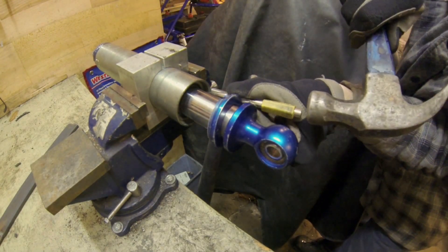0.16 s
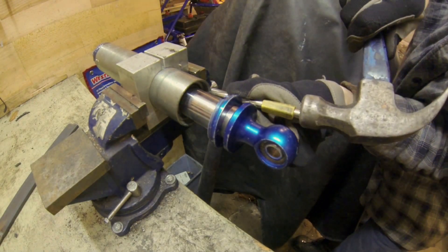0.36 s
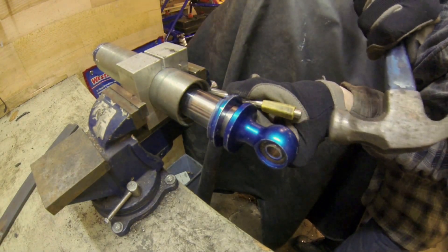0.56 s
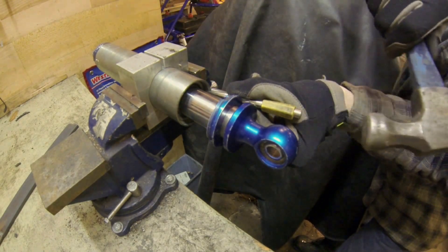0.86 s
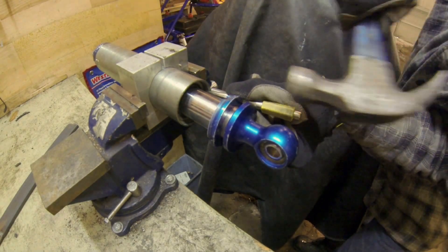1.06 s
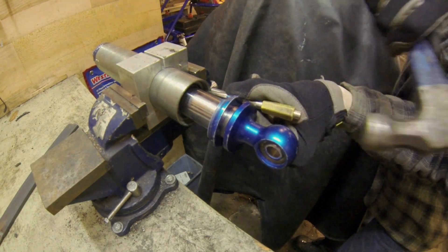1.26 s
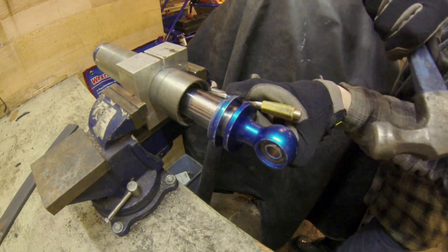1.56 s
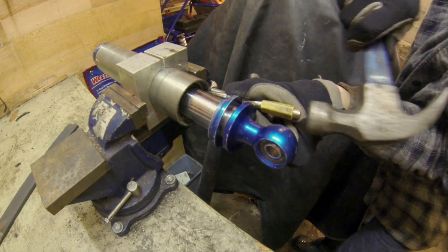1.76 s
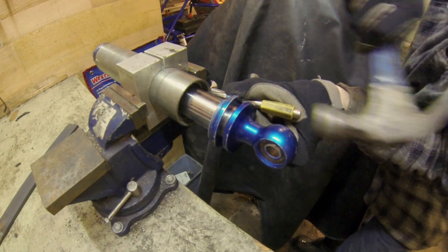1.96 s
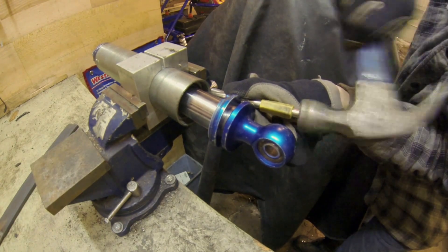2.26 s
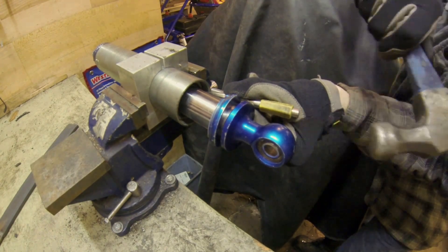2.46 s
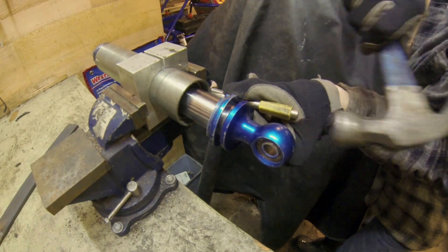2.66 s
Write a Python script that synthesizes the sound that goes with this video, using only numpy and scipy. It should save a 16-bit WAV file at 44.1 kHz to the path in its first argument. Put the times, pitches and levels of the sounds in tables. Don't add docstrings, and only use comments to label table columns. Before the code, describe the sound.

Hammer tapping a steel punch on a vise-held metal part, sharp clanks in a small workshop

```python
import sys
import numpy as np
from scipy import signal
from scipy.io import wavfile

SR = 44100
rng = np.random.default_rng(int(sys.argv[2]) if len(sys.argv) > 2 else 0)


def master(y):
    cut = np.clip(np.atleast_2d(y).T, -1, 1)
    pcm = np.round(cut * 32767)
    wavfile.write(sys.argv[1], SR, pcm.astype(np.int16))


def convert_level_to_amplitude(level_db):
    exponent = np.asarray(level_db, float) / 20
    return 10 ** exponent


N = 123479

# [f/Hz, level/dB per Hz]
HISS_SPECTRUM = [(5000, 2), (8500, 1), (10300, -3), (12000, -6), (15000, -4)]
# [f/Hz, level/dB per Hz]
AIR_SPECTRUM = [(20, -3.5), (42, -5.5), (130, -17), (377, -13.5), (900, -12.5), (1300, -24.5), (1800, -18),
                (3600, -30), (7000, -52), (16000, -71)]
# [multiple of shaft speed, level/dB rms]
HUM_LINES = [(1, -48), (3, -62), (6, -61), (9, -54), (12, -57), (18, -56), (25, -62)]
# [f/Hz, t60/s]
TAIL_SPECTRUM = [(71, -56), (120, -5.5), (150, -15), (261, 0.5), (355, -6), (839, -14), (5300, -35.5),
                 (12300, -44.5), (16000, -62)]
TAIL_DECAY = [(120, 0.38), (1000, 0.26), (4000, 0.4), (15000, 0.13)]
# [t/s, level/dB]
BAR_RINGS = [
    (1.98, -40),
    (2.2676, -52),
    (2.538, -42),
]
# [f/Hz, level/dB, t60/s]
LEG_MODES = [(40, -17.5, 0.55), (65.8, -6, 0.35)]
BENCH_MODES = [(69.86, -14.5, 0.55), (81.6, 7, 0.18), (87.9, -13.5, 0.44)]
VISE_MODES = [(204.7, -11.5, 0.4), (239.8, 6.5, 0.12), (252.6, -12, 0.097), (313.5, -18.5, 0.13),
              (407, -24, 0.09)]
JAW_MODES = [(476, -3, 0.062), (486, -2.5, 0.088), (523, -6.5, 0.082)]
PART_MODES = [(606.5, -5, 0.19), (693, 1.5, 0.088), (749, -12.5, 0.23), (843, -8, 0.17), (878, -7.5, 0.097),
              (1030, -2, 0.048)]
COLLAR_MODES = [(1194, -3, 0.047), (2303, -4, 0.064), (2343, -2.5, 0.024), (2607, -4, 0.084),
                (2865, -3, 0.041), (3367, -5.5, 0.032)]
PUNCH_MODES = [(1550, -2.5, 0.027), (1695, 2, 0.012), (1809, -5.5, 0.034), (1970, -18.5, 0.09)]
HEAD_MODES = [(3700, -7, .03), (3860, -3, .04), (4260, -7, .02), (4700, -8, .02), (5070, -7, .025),
              (5300, -6, .03), (5600, -6, .025), (6700, -11, .02), (7200, -12, .035), (8200, -7, .012),
              (9800, -5, .012), (11500, -14, .012)]
# [f/Hz, t60/s]
CRACK_SPECTRUM = [(180, -72), (300, -2), (801, 6), (1250, -24), (1480, -8), (5160, -7.5), (8220, -18),
                  (12300, -10.5), (16000, -52)]
CRACK_DECAY = [(300, 0.038), (1500, 0.069), (5000, 0.043), (15000, 0.0084)]
BLOW_S = [.2981, .6386, .9576, 1.3585, 1.6715, 1.9804, 2.2676, 2.5382]
# [clank level/dB, vise level/dB, bench level/dB, crack level/dB]
BLOW_LEVELS = [
    (-29, -29, -29.5, -28),
    (-25, -15.2, -15.5, -10.5),
    (-12.5, -18, -18.5, -6),
    (-6.5, -16, -17, -10.5),
    (-4, -15, -17, -14),
    (-4, -17, -17, -14),
    (-3.5, -19, -18.5, -12),
    (-4.5, -21, -19.5, -14),
]
# [part level/dB, jaw level/dB, collar level/dB, head level/dB,
# sharpness/dB per octave above 4 kHz]
BLOW_LANDINGS = [
    (-23, -19.5, -34.5, -36.5, -5),
    (-14.1, -7.5, -12.5, -16.5, -1.5),
    (-15, -9, -15.5, -11.5, -4.5),
    (-14, -9, -21.5, -18.5, -6),
    (-14, -11, -19.5, -20.5, 1.6),
    (-18, -19, -19, -18, -0.8),
    (-21.1, -25, -22.5, -17, -1.3),
    (-23.5, -29, -20, -18.5, -0.1),
]
# [t/s, crack level/dB, clank level/dB]
PUNCH_SLIPS = [
    (0.646, -23, -11.5),
    (0.962, -19.5, -25),
    (1.3629, -32, -7),
    (1.986, -29, -33),
    (2.2743, -30, -28),
]

CLANK_DB, VISE_DB, BENCH_DB, CRACK_DB = np.transpose(BLOW_LEVELS)
PART_DB, JAW_DB, COLLAR_DB, HEAD_DB, SHARP_DB = np.transpose(BLOW_LANDINGS)
SLIP_S, SLIP_CRACK_DB, SLIP_CLANK_DB = np.transpose(PUNCH_SLIPS)
BLOW_S = np.array(BLOW_S)
ALL_S = np.append(BLOW_S, SLIP_S)
ALL_SHARP_DB = np.append(SHARP_DB, 0 * SLIP_S)
PART_TRAVEL_S, BENCH_TRAVEL_S = .0018, .0038


def at_hz(points, hz):
    table_hz, value = np.transpose(points)
    return np.interp(np.log(hz), np.log(table_hz), value)


def octaves_up(hz):
    return max(0, np.log2(hz / 4000))


def drift(rate):
    r = np.exp(-80 * np.pi * rate / SR)
    chance = rng.standard_normal(N // 40 + 2002)
    slow = signal.lfilter([1], [1, -2 * r, r * r], chance)[2000:]
    return np.interp(np.arange(N) / 40, np.arange(len(slow)), slow / slow.std())


def clicks(s, db):
    out = np.full(N, 1e-18)
    out[(np.asarray(s) * SR).astype(int)] = convert_level_to_amplitude(db)
    return out


def swell(x, t60, rise_s):
    r = convert_level_to_amplitude(-60 / (max(t60, .005) * SR))
    q = np.exp(-1 / (max(rise_s, 1e-5) * SR))
    return signal.lfilter([1], [1, -r], x) - signal.lfilter([1], [1, -r * q], x)


def modes(s, db, table, rise_s=1e-5, tilt_db=0, turn=1, vary=1):
    out = np.zeros(N)
    vary_db = 1.2 * vary * rng.standard_normal((len(s), len(table)))
    for k, (hz, mode_db, t60) in enumerate(table):
        x = clicks(s, db + mode_db + vary_db[:, k] + tilt_db * octaves_up(hz))
        w = 2 * np.pi * hz / SR
        r = convert_level_to_amplitude(-60 / (t60 * SR))
        for pole, sign in ((r, 1), (r * np.exp(-1 / (rise_s * SR)), -1)):
            ring = signal.lfilter([0, np.sin(w)], [1, -2 * pole * np.cos(w), pole ** 2], x)
            out += sign * turn ** k * ring
    return out


def bands(spectrum, envelope):
    edges = 20 * 2 ** np.arange(0, 9.8, 1 / 3)
    white = rng.standard_normal((2, N + 8000))
    centres = np.sqrt(edges[1:] * edges[:-1])
    gains = convert_level_to_amplitude(at_hz(spectrum, centres)) * (centres > spectrum[0][0])
    gains = gains / np.sqrt(np.sum(gains ** 2 * np.diff(edges)) * 2 / SR)
    out = np.zeros(N)
    for k in np.nonzero(gains > 0)[0]:
        band = signal.butter(2, edges[k:k + 2], "band", fs=SR, output="sos")
        out += gains[k] * envelope(centres[k]) * signal.sosfilt(band, white[k % 2])[-N:]
    return out


def hiss():
    return convert_level_to_amplitude(-74) * bands(HISS_SPECTRUM, lambda hz: 1)


def room_noise():
    patchy_db = 2.24
    return convert_level_to_amplitude(-45.5) * bands(AIR_SPECTRUM, lambda hz: convert_level_to_amplitude(patchy_db * drift(2.7)))


def fan():
    shaft_hz = 37.75 * (1 + 0.00364 * drift(3.08))
    turn = 2 * np.pi * np.cumsum(shaft_hz) / SR
    hum = np.zeros(N)
    for k, db in HUM_LINES:
        hum += convert_level_to_amplitude(db + 0.05 + 3) * np.sin(k * turn + rng.uniform(0, 2 * np.pi))
    return hum


def room_tail():
    tail_db, rise_s, follows_sharp = -20, 0.0064, 0.41
    rows = np.transpose([db - db.mean() for db in (VISE_DB, PART_DB, HEAD_DB)])

    def envelope(hz):
        blow_db = np.array([at_hz(list(zip((240, 600, 3000), row)), hz) for row in rows])
        sharp_db = follows_sharp * SHARP_DB * octaves_up(hz)
        return swell(clicks(BLOW_S, tail_db + blow_db + sharp_db), at_hz(TAIL_DECAY, hz), rise_s)

    return bands(TAIL_SPECTRUM, envelope)


def bar():
    hz, t60, rise_s = 822, 1.6, .02
    s, db = np.transpose(BAR_RINGS)
    return swell(clicks(s, db), t60, rise_s) * np.sin(2 * np.pi * hz * np.arange(N) / SR)


def bench():
    s, db = BLOW_S + BENCH_TRAVEL_S, BENCH_DB + 11
    return modes(s, db, BENCH_MODES, rise_s=.04) + modes(s, db, LEG_MODES, rise_s=.012)


def vise():
    rise_s = 0.002
    jaw = modes(BLOW_S + PART_TRAVEL_S, JAW_DB, JAW_MODES, rise_s)
    return jaw + modes(BLOW_S + BENCH_TRAVEL_S, VISE_DB, VISE_MODES, rise_s)


def part():
    return modes(BLOW_S + PART_TRAVEL_S, PART_DB, PART_MODES, rise_s=0.0038)


def collar():
    return modes(BLOW_S, COLLAR_DB, COLLAR_MODES, turn=-1)


def punch():
    db = np.append(CLANK_DB, SLIP_CLANK_DB) - 5.5
    return modes(ALL_S, db, PUNCH_MODES, rise_s=.0002)


def hammer_head():
    db = np.append(HEAD_DB, SLIP_CRACK_DB - 5)
    return modes(ALL_S, db, HEAD_MODES, tilt_db=ALL_SHARP_DB, turn=-1.055, vary=1.15)


def crack():
    db = np.append(CRACK_DB, SLIP_CRACK_DB) - 0.5

    def envelope(hz):
        contacts = clicks(ALL_S, db + ALL_SHARP_DB * octaves_up(hz))
        return swell(contacts, at_hz(CRACK_DECAY, hz), rise_s=.0004)

    return bands(CRACK_SPECTRUM, envelope)


def scene():
    background = hiss() + room_noise() + fan() + room_tail() + bar()
    blows = bench() + vise() + part() + collar() + punch() + hammer_head() + crack()
    return (background + blows)[None]


def low_pass(x):
    return signal.sosfilt(signal.butter(12, 16500, fs=SR, output="sos"), x)


def record(dry):
    top, cutoff_hz, rumble_hz = 1.6, 16600, 28
    x = top * np.tanh(dry / top)
    x = signal.sosfilt(signal.cheby2(10, 60, cutoff_hz, fs=SR, output="sos"), x)
    x = signal.sosfilt(signal.butter(2, rumble_hz, "high", fs=SR, output="sos"), x)
    return low_pass(x)


dry = scene()
out = record(dry)
master(out)
```